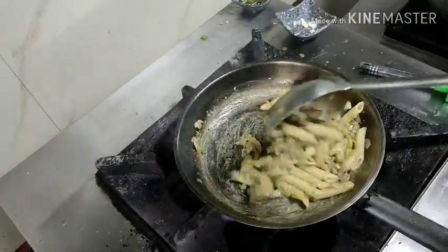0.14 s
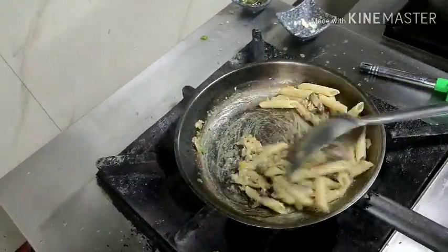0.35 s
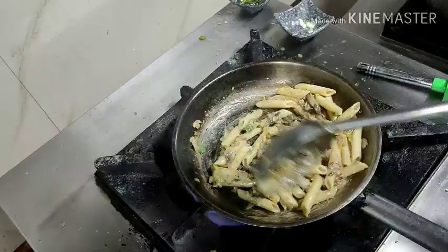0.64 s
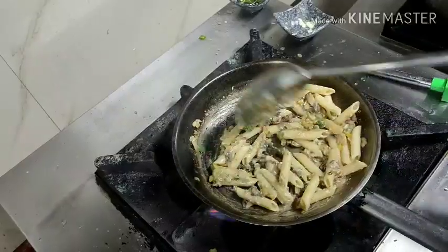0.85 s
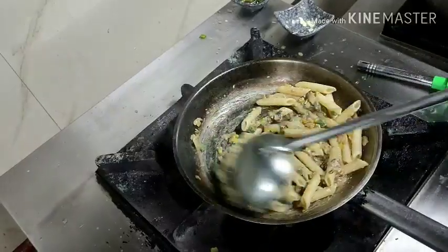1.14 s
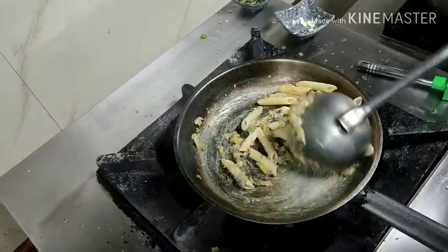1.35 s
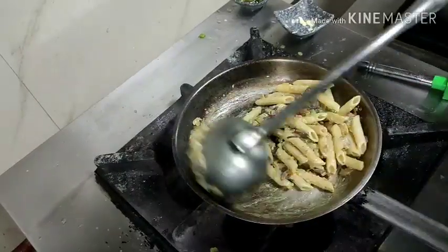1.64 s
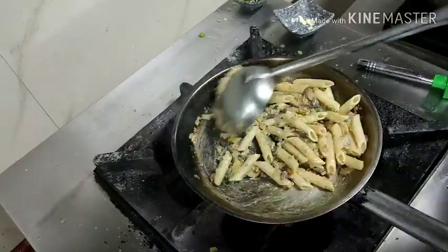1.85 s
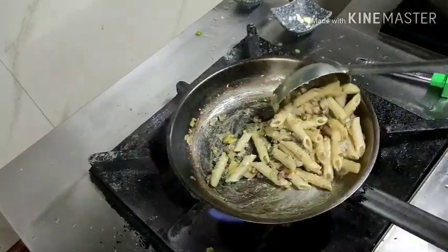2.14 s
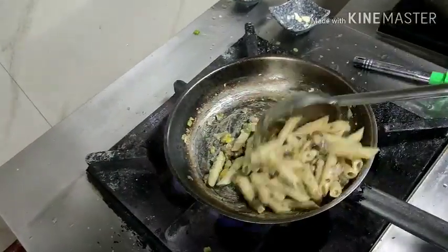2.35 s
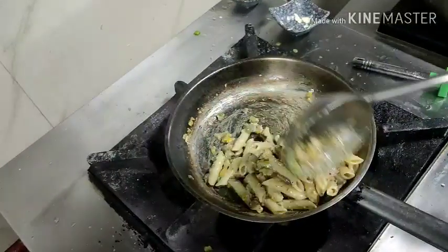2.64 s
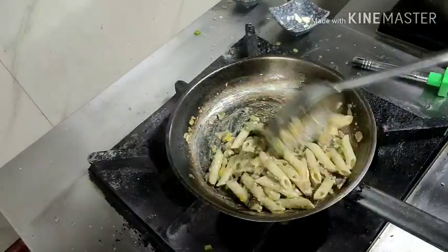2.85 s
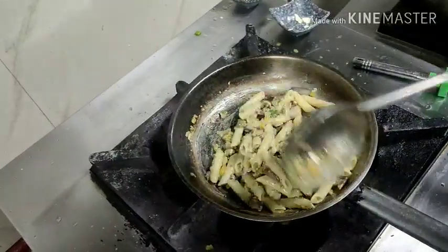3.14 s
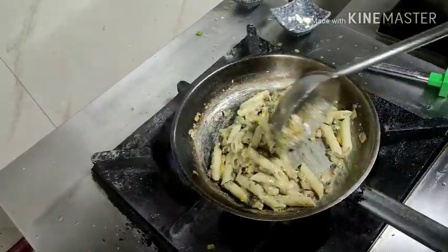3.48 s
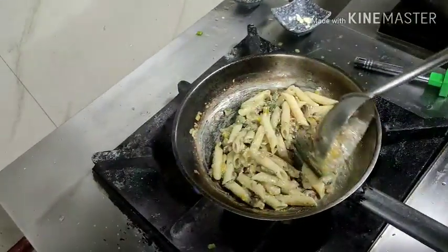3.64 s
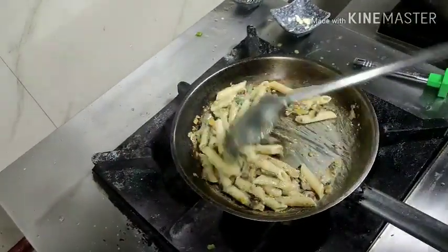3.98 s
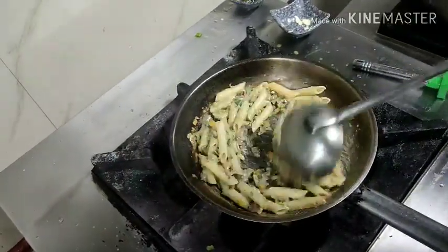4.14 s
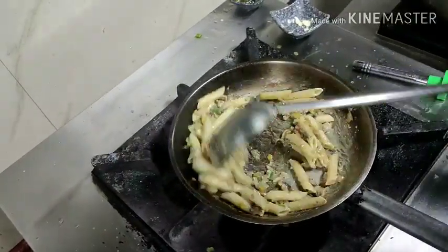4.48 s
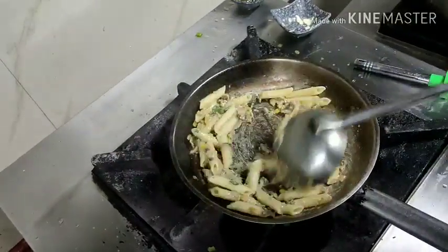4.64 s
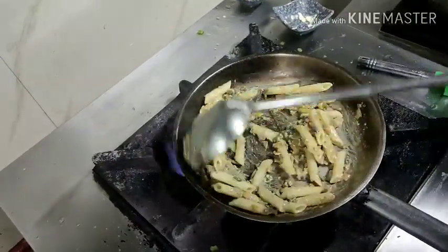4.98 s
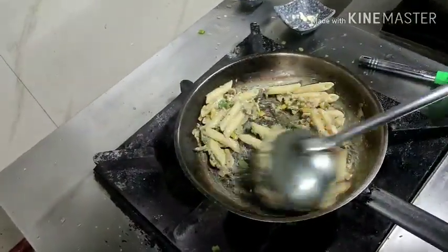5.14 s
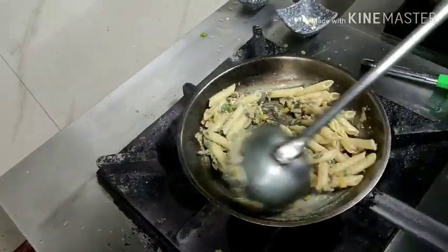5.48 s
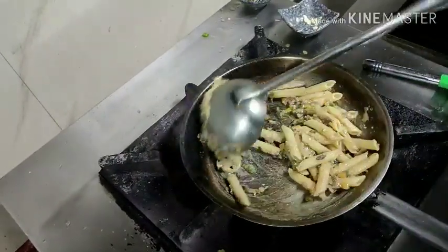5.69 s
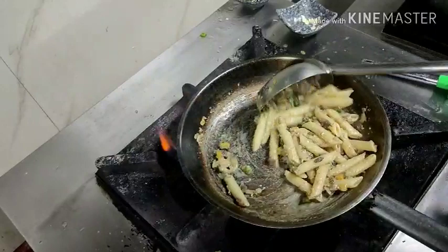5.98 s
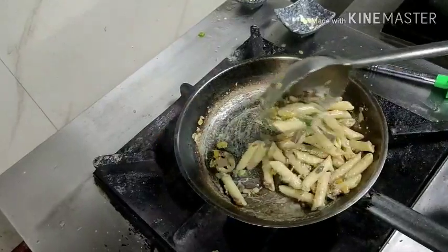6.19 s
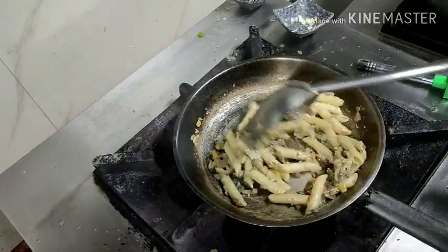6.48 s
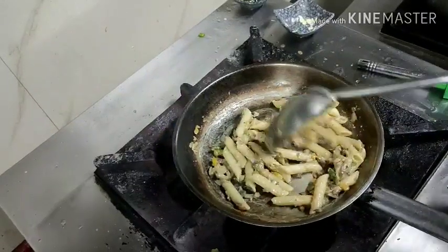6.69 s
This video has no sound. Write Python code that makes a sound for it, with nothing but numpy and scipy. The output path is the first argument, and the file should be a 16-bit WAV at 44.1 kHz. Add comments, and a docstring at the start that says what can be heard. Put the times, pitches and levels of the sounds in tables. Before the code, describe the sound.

Pasta is stirred in a steel frying pan, heard close up in a hard-walled kitchen. A burst of sizzling comes first, followed by irregular ringing clanks and rasping drags of a metal ladle. The sauce hisses and crackles in repeated surges, dropping back in the middle and busiest in the second half. Slight high squeals, small wet ticks and a barely audible gas flame lie underneath, with the treble stronger on the left.

```python
"""Sauce sizzles, then a steel ladle knocks and scrapes as it stirs pasta in a steel frying pan.
Steam bubbles burst wherever the hot bottom is laid bare. Each knock rings the pan and echoes off hard
kitchen walls; dragging makes it rasp, hum and squeal. Wet food ticks and a gas burner rushes faintly.
Two microphone openings hear it all, the left one brighter, through a noise suppressor."""
import sys
import numpy as np
from scipy import signal
from scipy.io import wavfile
from scipy.ndimage import uniform_filter1d

SR = 44100
rng = np.random.default_rng(int(sys.argv[2]) if len(sys.argv) > 2 else 0)


def file_out(sig):
    """Save sig as 16-bit WAV at sys.argv[1]."""
    # one column per channel
    cols = np.atleast_2d(sig).T
    # limit, then scale
    lim = np.clip(cols, -1, 1)
    pcm = np.round(lim * 32767).astype(np.int16)
    wavfile.write(sys.argv[1], SR, pcm)


N = 300762


def amp(db):
    return 10 ** (np.asarray(db) / 20)


def rms_one(x):
    return x / np.sqrt(np.mean(x ** 2) + 1e-20)


def at_hz(curve, hz):
    """Read between the rows of a table of pitch and value."""
    pitches, values = np.transpose(curve)
    return np.interp(np.log(hz), np.log(pitches), values)


def drift(rate_hz):
    """A smooth random wander, about 1 in size."""
    r = np.exp(-80 * np.pi * rate_hz / SR)
    slow = signal.lfilter([1], [1, -2 * r, r * r], rng.standard_normal(N // 40 + 2002))[2000:]
    return np.interp(np.arange(N) / 40, np.arange(len(slow)), rms_one(slow))


def grains(per_s, spread_db):
    """Four streams of random clicks of uneven size."""
    sizes = amp(spread_db * np.minimum(rng.exponential(1, (2, 2, N)), 5))
    clicks = sizes * rng.standard_normal((2, 2, N))
    return rms_one(clicks * (rng.random((2, 2, N)) < per_s / SR) + 1e-9)


def resonate(x, hz, width_hz):
    """Let a sound ring around one pitch."""
    r = np.exp(-np.pi * width_hz / SR)
    feedback = [1, -2 * r * np.cos(2 * np.pi * hz / SR), r * r]
    return signal.lfilter(np.array([1, 0, -1]) * (1 - r * r) / 2, feedback, x)


def swells(peak_s, rise_s, fall_s, peak_db, *colours):
    """Add swells into one level in dB and blend their colours. Rise and fall times cover 20 dB."""
    t = np.arange(0, N / SR + .002, .001)
    since = t - peak_s[:, None]
    span = np.where(since < 0, -np.maximum(rise_s, .003)[:, None], np.maximum(fall_s, .05)[:, None])
    power = amp(np.maximum(peak_db[:, None] - 20 * since / span, -130)) ** 2
    total = power.sum(axis=0)
    curves = [10 * np.log10(total)] + [colour @ power / total for colour in colours]
    return [np.interp(np.arange(N) / SR, t, curve) for curve in curves]


# Each row: pitch in Hz, how alike left and right are (1 is the same, 0 or less is unrelated).
LIKENESS = [(60, 0.91), (180, 1), (550, 0.75), (1650, 0.0095), (4970, -1.35), (15000, -0.67)]
# Each row: pitch in Hz, how much louder the left side is in dB.
LEFT_BOOST = [(60, -1), (130, 0), (290, 1.5), (640, -0.5), (1410, 0), (2500, 2.5), (4800, 10), (8000, 5.5),
              (12000, 10.5), (15000, 16)]
def stereo(mid, side, hz):
    """The two openings hear lows alike; highs differ and are stronger on the left."""
    alike = np.clip(at_hz(LIKENESS, hz), 0, 1)
    both = np.sqrt(1 + alike) * mid + np.sqrt(1 - alike) * side * np.array([[1], [-1]])
    return both * amp(at_hz(LEFT_BOOST, hz) * np.array([[.5], [-.5]]))


BAND_EDGES_HZ = 22 * 2 ** np.arange(0, 9.7, .4)
def banded(source, gain, low_hz, high_hz):
    """Split a sound into stereo bands, each with its own gain(hz)."""
    out = np.zeros((2, N))
    for k, (low, high) in enumerate(zip(BAND_EDGES_HZ, BAND_EDGES_HZ[1:])):
        hz = np.sqrt(low * high)
        if low_hz < hz < high_hz:
            band = signal.butter(2, [low, high], "band", fs=SR, output="sos")
            mid, side = signal.sosfilt(band, source[k % 2])
            out += gain(hz) * stereo(mid, side, hz)
    return out


# The tone of the flame. Each row: pitch in Hz, strength in dB.
BURNER_TONE = [(15, -35), (25, -1), (38, 2.5), (65, 1.5), (249, -5), (503, -13.5), (1190, -20), (1790, -11),
               (4250, -14), (5000, -79.5), (6380, -14), (13200, -13.5), (16000, -43.5)]
def burner(level_db=-57.5):
    """The faint, patchy rush of flame and kitchen."""
    noise = rng.standard_normal((2, 2, N))
    rush = banded(noise, lambda hz: amp(at_hz(BURNER_TONE, hz) + 3.6 * drift(7.3)), 20, 17000)
    return amp(level_db) * rms_one(rush)


# Each row: start in seconds, level in dB, pitch in Hz.
WET_TICKS = [(0.41, -57, 6460), (0.79, -63.5, 6354), (3.093, -46, 6240), (3.094, -57.5, 3220),
             (3.113, -60, 6080), (3.531, -51, 6626), (3.53, -49.5, 9420), (4.17, -40.5, 10500),
             (6.489, -43, 6450), (6.67, -57.5, 9700)]
def wet_ticks(ring_s=0.045, snap_db=8.5):
    """Pasta and sauce tick: a short ring on top of a snap of noise."""
    out, t = np.zeros((2, N + SR)), np.arange(SR // 10) / SR
    fade = amp(-60 * t / ring_s)
    for start_s, db, hz in WET_TICKS:
        snap = amp(snap_db) * resonate(rng.standard_normal((2, len(t))), 8500, 3500) * fade ** 2
        ring = fade * np.sin(2 * np.pi * hz * t)
        i = round(start_s * SR)
        out[:, i:i + len(t)] += amp(db) * stereo(ring + snap[0], snap[1], hz)
    return out[:, :N]


# Each row: peak time, rise and fall in seconds, level in dB, pitch in Hz, glide in Hz per second.
SQUEALS = [(1.39, 0.27, 0, -51.5, 6430, -300), (1.991, 0.7, -0.2, -58, 6170, 50),
           (2.131, -0.33, 0.4, -43.5, 5960, 49), (3.92, 0.5, 2, -51, 6370, 300.5),
           (5.472, 0.3, 0.33, -46, 6090, 599), (6.128, 1.5, -0.3, -56, 6880, 1998)]
def squeals(width_hz=72):
    """The ladle's rim slides on steel with a thin, wavering tone that glides."""
    out, t = np.zeros((2, N)), np.arange(N) / SR
    noise = rng.standard_normal((2, 2, N))
    wobble = rms_one(signal.lfilter([1], [1, -np.exp(-np.pi * width_hz / SR)], noise))
    for peak_s, rise_s, fall_s, db, hz, glide in SQUEALS:
        rise_s, fall_s = max(rise_s, .02), max(fall_s, .02)
        near = slice(max(round((peak_s - 3 * rise_s) * SR), 0), round((peak_s + 3 * fall_s) * SR))
        since = t[near] - peak_s
        phase = 2 * np.pi * (hz * since + glide * since ** 2 / 2)
        mid, side = wobble[0, :, near] * np.cos(phase) + wobble[1, :, near] * np.sin(phase)
        loudness = amp(db - 20 * since / np.where(since < 0, -rise_s, fall_s))
        out[:, near] += loudness * stereo(mid, side, hz)
    return out


# Two low notes of the pan. Each row: pitch in Hz, width in Hz.
HUM_NOTES = [(266, 42.4), (412, 32.5)]
def pan_hum(lag_s=0.042, blow_rise_s=0.022):
    """Strokes and blows shake the whole pan on its stand, and it hums fairly evenly."""
    blow_s, *_, blow_lower_db, blow_upper_db, blow_fall_s = np.transpose(BLOWS)
    stroke_s, rise_s, fall_s, _, _, lower_db, upper_db = np.transpose(STROKES)
    timing = (np.append(stroke_s, blow_s + lag_s),
              np.append(rise_s, np.full(len(BLOWS), blow_rise_s)),
              np.append(fall_s, blow_fall_s))
    peaks_db = np.append(lower_db, blow_lower_db), np.append(upper_db, blow_upper_db)
    shake, out = rng.standard_normal((2, N)), np.zeros((2, N))
    for (hz, width_hz), peak_db in zip(HUM_NOTES, peaks_db):
        level_db, = swells(*timing, peak_db)
        tone = rms_one(resonate(resonate(shake, hz, width_hz), hz, width_hz))
        swing = np.sqrt(uniform_filter1d(tone ** 2, size=600) + 0.054)
        out += amp(level_db) * stereo(*rms_one(tone / swing ** 0.28), hz)   # evens out the tone
    return out / 2


# The tone of the scrape. Each row: pitch in Hz, strength in dB.
DRAG_TONE = [(260, -43), (450, -14), (583, -1.5), (680, 0.5), (1000, 4), (1330, 8.5), (1480, -2),
             (1550, -39.5), (2400, -34.5), (3120, -45), (5280, -120)]
# Each row: peak time, rise and fall in seconds, then level, hollowness, lower hum and upper hum in dB.
STROKES = [(0.01, 4, 0.19, -52.5, -12, -53, -65.5), (0.28, 0.32, 0.27, -82, -12, -89, -56.5),
           (0.409, 0.1, 0.5, -61, -9, -95, -81), (0.636, 0.02, -0.11, -66.5, -2, -45.5, -79),
           (0.788, 0.1, 0.4, -71.5, -20, -97, -100), (1.305, 0.11, 0.14, -40.5, -5, -33.5, -48),
           (1.449, 0.06, -0.04, -51.5, -10.5, -57.5, -43.5), (1.7, 0.35, -0.04, -56.5, -0.5, -46, -54),
           (1.828, 0.14, 0.2, -43, -6, -40.5, -58), (1.92, 0.06, 0.35, -46.5, -11.5, -44.5, -51.5),
           (1.971, -0.03, 0.16, -44, -7, -40.5, -59), (2.05, 0.08, 0.39, -48.5, -13, -47.5, -53),
           (2.245, 0.12, 0.16, -48.5, -4, -55, -61.5), (2.468, -0.6, -0.05, -75.5, 4.5, -48.5, -80),
           (2.512, .004, 0.1, -47.5, 3.5, -54.5, -63), (2.654, -0.3, 0.18, -74.5, 14, -73, -52),
           (2.717, -0.23, -0.5, -54, 5, -58, -51.5), (3.796, -0.35, 0.3, -39.5, -8.5, -47.5, -57.5),
           (4.211, -0.05, 0.57, -41.5, -7, -66, -65.5), (4.244, -0.5, 0.17, -44, -3, -53.5, -57.5),
           (4.298, 0.09, 0.19, -37.5, -9.5, -45.5, -55), (4.5, -0.65, 0.16, -46.5, -5, -57, -39),
           (4.599, -0.96, 0.24, -60.5, -11.5, -54, -45), (4.704, -0.32, 0.09, -44, 3.5, -61, -49),
           (4.837, -0.3, -0.16, -60, -4, -51, -50), (5.065, 0, 0.28, -36, -5.5, -51.5, -63.5),
           (5.2, -0.12, 0.3, -47.5, 1.5, -45, -56), (5.4, 0.2, 0.42, -38, -6, -53.5, -53),
           (5.519, 0.21, 0.16, -37.5, -6, -52, -48.5), (5.742, 0.12, -0.01, -46.5, 0, -39.5, -50),
           (5.806, 0.08, 0.11, -39.5, -12.5, -44, -70), (6.006, 0.26, 0.0934, -41, -6.5, -44.5, -52),
           (6.11, 1.05, -0.1, -50, -10, -61, -60), (6.351, 0.4, 0.3, -80, 2, -60.5, -101),
           (6.41, -0.1, 0.6, -60, -15, -69.5, -100), (6.569, 0.1, 0.3, -56.5, 9, -67, -73.5),
           (6.599, -0.0054, 0.21, -48, 3, -44, -49)]
def ladle_drag():
    """The ladle's rim stutters over the steel: dense clicks that also ring the pan's middle notes."""
    level_db, hollow_db = swells(*np.transpose(STROKES)[:5])
    clicks = grains(per_s=1500, spread_db=1.3) * amp(1.2 * drift(30))

    def tilt_db(hz):
        # food between ladle and steel makes the sound hollow
        return (hollow_db + 7.5) * (1 if hz < 950 else -.7)
    direct = banded(clicks, lambda hz: amp(at_hz(DRAG_TONE, hz) + tilt_db(hz) + 4.4 * drift(8.1)),
                    420, 2600)
    rung = sum(amp(db + tilt_db(hz) + 1.2 * drift(24)) * stereo(*resonate(clicks[k % 2], hz, 76), hz)
               for k, (hz, db, *_) in enumerate(PAN_NOTES[3:10]))
    return amp(level_db) * rms_one(rms_one(direct) + amp(-6.5) * rms_one(rung))


def wet_patches(x, low_db, high_db):
    """Wet patches make narrow ranges of pitch swell and sink for about a tenth of a second."""
    hz, _, cells = signal.stft(x, SR, nperseg=512, noverlap=384)
    patches = uniform_filter1d(rng.standard_normal(cells.shape[1:]), size=3, axis=0)
    patches = rms_one(uniform_filter1d(patches, size=35, axis=1))
    depth_db = np.where(hz < 5300, low_db, high_db)[:, None]
    return signal.istft(cells * amp(depth_db * patches), nperseg=512, noverlap=384)[1][:, :N]


# The tone of the bubbles. Each row: pitch in Hz, strength in dB.
SIZZLE_TONE = [(1060, -82), (1800, -26), (2220, -11), (2550, -14.5), (3060, -4.5), (3400, -11.5),
               (3900, -7.5), (5200, -12), (6500, -3), (8000, -2.5), (10500, -12), (13000, -13),
               (14300, -14), (16000, -32)]
# Sauce flares up on bared steel. Each row: peak time, rise and fall in seconds,
# then level, low crackle, fine spray, steel ring and lean to the left in dB.
FLARES = [(0.06, 10, 0.206, -35, -9, -5.5, 3.5, -2), (0.413, -0.04, 0.55, -47, -7.5, 3, 5, -2),
          (0.6, 1.5, 2, -56, -10.5, -2.5, 1.5, -1), (0.795, 0.27, 0.3, -50.5, -4.5, -3.5, -2, 0),
          (1.15, 0.0947, 0.52, -42, 5, 2.5, 0.5, -3.5), (1.29, 0.32, 0, -46, -1.5, -0.5, 0, -1),
          (1.41, 0.1, 0, -45.5, -13.5, 0.5, 6, 7), (1.6, -0.15, 0.6, -45.5, 12.5, -24, 18, -13),
          (1.68, -0.0173, 0.39, -29, -9.5, -4, 4, 3.5), (1.745, 0, 0.6, -41, -16, -5.5, 6, -9),
          (1.83, 0.23, 0.21, -40.5, -21, -9, 2, 10), (1.89, 1.14, -2, -40.5, -12.5, -6, 6.5, -5),
          (2.0, 1.2, 3.5, -52, -16, -20.5, 11.5, -6), (2.035, -0.16, 0.39, -41.5, -12.5, 10.5, 1, -4),
          (2.066, -0.13, 0.5, -31.5, -10, -1.5, -2.5, -3), (2.22, 0.16, 0.2161, -29.5, -8.5, -8.5, 3, -2),
          (2.36, 1, -0.13, -44, 0, -10.5, 4, -13), (3.8, -0.6, 0.63, -44.5, 5.5, -19.5, 5, -3.5),
          (3.96, 0.27, .5, -37.5, -8.5, -2.5, 1, 2), (4.27, -0.2, 0.5, -46, -1.5, -15.5, 11.5, 0),
          (4.346, 0.07, 0.65, -30.5, -11, -5.5, -6, 2.5), (4.599, 0.23, 0.09, -30, -4.5, -6, 2.5, -4.5),
          (4.681, 0.26, 0.41, -38.5, -3, -3.5, 2.5, -2.5), (5.02, 0, 1, -39.5, -15.5, -4, 1, 0),
          (5.068, 0.05, 0.17, -30.5, -13, -3.5, -2.5, -1.5), (5.22, 0.14, 0.03, -31.5, -8.5, -1.5, 1, -7.5),
          (5.274, 0.2, 0.34, -42.5, 3, -8, 2, -18), (5.48, 0.27, 0.28, -39, 4.5, -4, 13.5, -2),
          (5.621, 0.07, 0.08, -31.5, -10.5, -3, -0.5, -2), (5.82, 0.77, 0.53, -40.5, -1.5, -4, -8.5, -3),
          (5.93, 0.08, 0.23, -36, -14, -2.5, -2, -1), (5.971, 0.36, 0.23, -33.5, -8, -5, 2, -1),
          (6.519, 0.14, 0.11, -40, -13, -10.5, 10.5, 10.5), (6.671, 0.9, 1, -51.5, -7, -15, 8, -1)]
def sizzle(fastest_rise_s=.012, clump_db=.5):
    """Thousands of steam bubbles burst each second and ring the steel; bigger ones crackle lower."""
    peak_s, rise_s, *rest = np.transpose(FLARES)
    rise_s = np.maximum(rise_s, fastest_rise_s)
    level_db, crackle_db, spray_db, steel_db, left_db = swells(peak_s, rise_s, *rest)
    clumps, bursts = drift(40), grains(per_s=12000, spread_db=0.9)

    def gain(hz, patchy_db):
        # the mix of bubble sizes shifts the low and high ends
        shift_db = (hz < 5200) * (crackle_db + 6.5) + (hz > 9500) * (spray_db + 7)
        return amp(at_hz(SIZZLE_TONE, hz) + shift_db + clump_db * clumps + patchy_db * drift(18))
    fizz = banded(bursts, lambda hz: gain(hz, patchy_db=1.45), 1600, 17000)
    steel = sum(gain(hz, patchy_db=3.5) * stereo(*resonate(bursts[k % 2, :, ::-1], hz, 38), hz)
                for k, hz in enumerate(PAN_HZ[10:16:2] + PAN_HZ[17:20:2] + PAN_HZ[20::2]))
    both = (fizz + amp(steel_db) * steel) / np.sqrt(1 + 0.25 * amp(steel_db) ** 2)
    loudness = amp(level_db + left_db * np.array([[.5], [-.5]]))
    return loudness * rms_one(wet_patches(both, low_db=4.5, high_db=2.5))


def blow_colour(hz, tone_db):
    """A flat blow thuds and booms, an edge blow bites and clinks."""
    thud, boom, bite, clink = tone_db
    return at_hz([(160, thud), (260, boom), (450, boom), (650, 0.034), (1500, 0.0047),
                  (2100, bite), (3200, bite), (4500, clink)], hz)


# The tone of the echo. Each row: pitch in Hz, strength in dB.
ECHO_TONE = [(35, -63), (60, -6), (256, -0.5), (354, -8), (408, -5), (566, -10), (749, -11), (862, -10),
             (1500, -15), (2900, -19.5), (5090, -22.5), (6580, -13.5), (13900, -27), (16000, -79)]
# Each row: pitch in Hz, seconds for the echo to fade by 60 dB.
ECHO_TIMES = [(100, 0.677), (260, 0.88), (700, 0.74), (1840, 0.9), (3200, 1), (4850, 0.68), (7500, 0.73),
              (12800, 0.37)]
def kitchen_echo():
    """The walls answer each blow: the pan's notes linger, wavering, in noise that dies band by band."""
    def envelope(hz, uneven_db, rim_db=0, lasting=1):
        kicks, chance = np.zeros(N), rng.standard_normal(len(BLOWS))
        for blow, luck in zip(BLOWS, chance):
            start_s, place, db, *tone_db, echo_db = blow[:8]
            colour_db = at_hz(ECHO_TONE, hz) + 0.77 * blow_colour(hz, tone_db) + 0.85 * place * rim_db
            kicks[round(start_s * SR)] = amp(db + echo_db + 16.5 + colour_db + uneven_db * luck)
        fall = amp(-60 / (lasting * at_hz(ECHO_TIMES, hz) * SR))
        rise = np.exp(-hz / (2.5 * SR))   # lows build up later
        early = amp(-60 / (.07 * SR))   # the nearest surfaces answer briefly
        tail = signal.lfilter([1], [1, -fall], kicks) + amp(4) * signal.lfilter([1], [1, -early], kicks)
        return signal.lfilter([1 - rise], [1, -rise], tail)
    noise = rng.standard_normal((2, 2, N))
    out = banded(noise, lambda hz: envelope(hz, uneven_db=1.73), 95, 17000)
    for k, (hz, note_db, stretch, rim_db) in enumerate(PAN_NOTES[2:]):
        tone = stereo(*resonate(noise[k % 2, :, ::-1], hz, 8 + 0.0029 * hz), hz)
        strength = amp(9.5 + 0.39 * note_db) * (hz / 1000) ** 0.37
        lasting = np.clip(0.38 + 0.27 * stretch, .3, 1.1)
        out += strength * envelope(hz, 2.8, rim_db, lasting) * tone
    return out


# The pitches at which pan and ladle ring, in Hz.
PAN_HZ = [161, 266, 412, 709, 780, 996, 1152, 1395, 1523, 1635, 2142, 2196, 2347, 2636, 2890, 2988, 3668,
          4045, 4188, 4535, 5512, 5758, 5985, 6295, 6472, 6765, 7140, 7563]
# One row per pitch. Each row: level in dB, how many times the blow's ring time it lasts,
# dB gained on a rim blow and lost on a bottom blow.
PAN_RING = [(12, 6.4, 4), (14.5, 5.54, 1), (-8.5, 16, -5), (1, 2.5, -1.5), (0, 1.8, -0.5), (2.5, 0.87, 0.5),
            (2.5, 1.2, -2), (1, 2, -3), (-6.5, 1.2, 2), (-2.5, 1.7, 6), (-9, 1.4, 2.5), (-13, 1.4, 4.5),
            (-9, 1.6, 3.5), (-4, 2, 4), (-3, 1.5, 7.5), (-8, 1.5, 5.5), (-12.5, 1.7, 2.5), (-4, 1.3, -10),
            (-7.5, 1.6, -4.5), (-7, 1.2, -8.5), (1.5, 1.2, 9), (-10, 0.75, 2.5), (-9, 1.4, -2), (-7, 1, 4),
            (-10.5, 1.4, 0.5), (-18.5, 1.3, 5.5), (-14.5, 0.99, -1), (-11.5, 1.1, -0.5)]
PAN_NOTES = [(hz, *ring) for hz, ring in zip(PAN_HZ, PAN_RING)]
# The ladle's bowl, deadened by the hand. Each row: pitch in Hz, level in dB, seconds to fade by 60 dB.
LADLE_CLACK = [(1047, -5.5, 0.027), (1216, -5.5, 0.03), (1569, -7, 0.013), (4520, -3.5, 0.01),
               (6100, -10.5, 0.0068)]
# The first instant of contact. Each row: pitch in Hz, level in dB, seconds to fade by 60 dB.
CONTACT_CRACK = [(780, -14.5, 0.0053), (1350, -12, 0.0049), (2570, -9, 0.0044), (5200, -13.5, .003)]
# The ladle hits the pan. Each row: start in seconds, place (below 0 toward the bottom, 1 at the rim),
# level in dB, then thud, boom, bite, clink and echo in added dB, ring time in seconds,
# clack in added dB, lower hum and upper hum in dB, seconds for the hum to fade by 20 dB.
BLOWS = [(0.409, -.3, -61, -34.5, -25, -14, -9, -26, 0.069, -11.5, -91, -81, 0.17),
         (0.633, .1, -69, -5, 7.5, -7.5, 2, -10.5, 0.29, -2.5, -55.5, -83, 0.044),
         (1.099, -0.69, -16, -23.5, -7, -3, -12.5, -11.5, 0.063, 5.5, -34.5, -62.5, 0.47),
         (1.584, -2.2, -24.5, -6, -6, 0, -19, -12, 0.043, 5, -48.5, -40.5, 0.21),
         (1.968, -.3, -34.5, -47, -16.5, -29, -52.5, -21.5, 0.16, 4, -42, -49, 0.082),
         (2.23, .1, -46, -11.5, -20, 13.5, 16, -9, 0.037, -7, -51, -53, 0.12),
         (2.511, 0.3, -35.5, -22.5, -5, -49.5, -58, -15.5, 0.089, -10, -43, -47.5, 0.22),
         (2.716, .1, -72, -1.5, 21, 3, 6.5, -29, 0.082, 12.5, -44, -48, 0.045),
         (2.756, 0.45, -23.5, -19.5, -7.5, 0.5, -0.5, -5.5, 0.1, -6, -49, -35, 0.27),
         (3.239, 0.79, -21, -29.5, -18, 0, -8, -5.5, 0.092, 2.5, -38.5, -34, 0.2695),
         (3.253, 0.94, -22.5, -34, -14, -3.5, -4.5, -28, 0.064, 9, -81, -80, .1),
         (3.531, 0.42, -41.5, -43.5, -31, -21.5, -3, -18, 0.019, -2, -82, -62, .1),
         (3.669, 0.72, -22, -9, -8.5, 1.5, -6.5, -6.5, 0.06, 1, -34, -44, 0.43),
         (4.204, -0.099, -50, -46.5, -24, 6, -22, -7, 0.076, -5.5, -52, -53.5, 0.52),
         (4.286, -0.065, -35.5, -44.5, -21.5, 9.5, -35, -12, 0.051, -20, -39, -48.5, 0.16),
         (4.432, -0.83, -16, -31.5, -11, -1.5, -8.5, -12.5, 0.049, 10.5, -41, -46.5, 0.39),
         (4.7, .1, -44.5, -46, -4.5, -23, -11.5, -19, 0.058, 11.5, -58.5, -46.5, 0.27),
         (5.064, -0.19, -33.5, -14, -9.5, 5.5, -12, -11.5, 0.17, -20, -32.5, -40, 0.17),
         (5.2615, -1.5, -15.5, -21, -16.5, 0.5, -9.5, -15.5, 0.058, 9.5, -41, -47, 0.26),
         (5.803, -.6, -17.5, -46.5, -18, -6.5, -43.5, -17, 0.028, 10, -34, -57, 0.13),
         (6.49, .1, -61, -16, -21, 6, 2.5, -7, 0.081, -8, -92, -83.5, 0.11),
         (6.573, .1, -38.5, -25, -2, -53, -16, -22.5, 0.23, -19, -41, -49, 0.41)]
def ladle_knocks(contact_s=0.0009):
    """Each blow rings all the pan's notes at once; the food damps and detunes them."""
    out, t = np.zeros((2, N + SR)), np.arange(SR // 2) / SR
    pan_hz, pan_db, stretch, rim_db = np.transpose(PAN_NOTES)
    short_hz, short_db, short_fade_s = np.transpose(LADLE_CLACK + CONTACT_CRACK)
    is_clack = np.arange(len(short_hz)) < len(LADLE_CLACK)
    attack = 1 - np.exp(-t / contact_s)
    chance = rng.standard_normal((len(BLOWS), 3, len(pan_hz) + len(short_hz)))
    for blow, (strength, skew, detune) in zip(BLOWS, chance):
        start_s, place, db, *tone_db, _, ring_s, clack_db = blow[:10]
        hz = np.append(pan_hz, short_hz) * (1 + 0.0015 * detune)
        note_db = np.append(pan_db - 13.5 + place * rim_db, short_db + clack_db * is_clack)
        note_db += blow_colour(hz, tone_db) + 2 * strength
        fade = amp(-60 * t / np.append(ring_s * stretch, short_fade_s)[:, None])
        # higher notes reach left and right out of step
        lead = np.sign(skew) * np.arccos(np.clip(at_hz(LIKENESS, hz), 0, 1)) / 2
        i = round(start_s * SR)
        for side, sign in enumerate((1, -1)):
            waves = fade * np.sin(2 * np.pi * hz[:, None] * t + sign * lead[:, None])
            gains = amp(db + note_db + sign * at_hz(LEFT_BOOST, hz) / 2)
            out[side, i:i + len(t)] += attack * (gains @ waves)
    # a pan this small gives off no deep bass
    return signal.sosfilt(signal.butter(4, 110, "high", fs=SR, output="sos"), out[:, :N])


def scene():
    """All the sounds together, in stereo."""
    stirring = sizzle() + ladle_drag() + ladle_knocks() + kitchen_echo()
    return stirring + pan_hum() + squeals() + wet_ticks() + burner()


# Each row: pitch in Hz, width in Hz, boost or cut in dB.
HOUSING = [(3373, 320, -3), (5120, 860, -3.5), (13630, 880, 5)]
def housing(x):
    """The microphone's case adds two dips and a peak to the treble."""
    for hz, width_hz, db in HOUSING:
        x = x + (amp(db) - 1) * resonate(x, hz, width_hz)
    return x


def suppress_noise(x, margin_db, depth_db):
    """Each pitch is turned down as it nears its own quiet level."""
    cells = signal.stft(x, nperseg=1024, noverlap=768)[2]
    power = np.mean(abs(cells) ** 2, axis=0)
    power = uniform_filter1d(uniform_filter1d(power, size=3, axis=0), size=5, axis=1)
    quiet = uniform_filter1d(np.percentile(power, 10, axis=1), size=9)[:, None]
    gain = np.maximum(1 - amp(margin_db) * np.sqrt(quiet / (power + 1e-20)), amp(-depth_db))
    return signal.istft(cells * gain, nperseg=1024, noverlap=768)[1][:, :N]


def record(dry):
    """The case colours the sound, steady noise is turned down and the highest treble is cut."""
    treble_cut = signal.cheby2(14, 60, 16000, fs=SR, output="sos")
    return signal.sosfilt(treble_cut, suppress_noise(housing(dry), margin_db=2.5, depth_db=12))


dry = scene()
out = record(dry)
file_out(out)
```